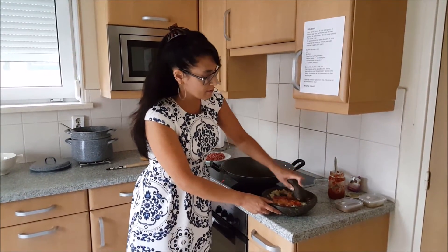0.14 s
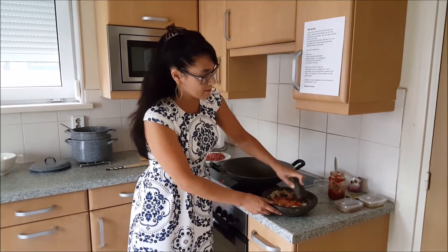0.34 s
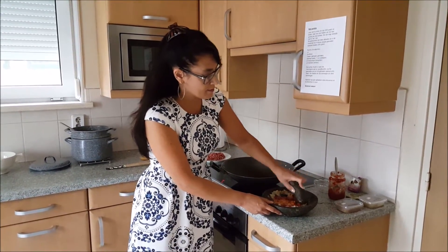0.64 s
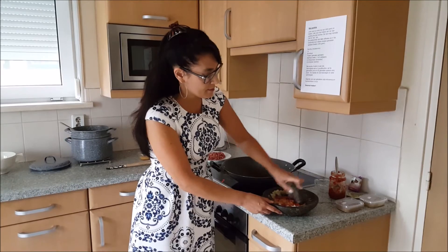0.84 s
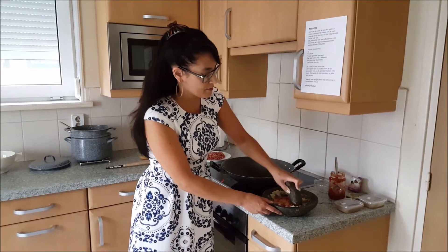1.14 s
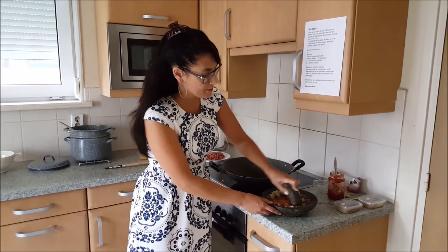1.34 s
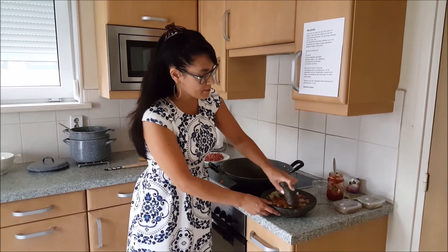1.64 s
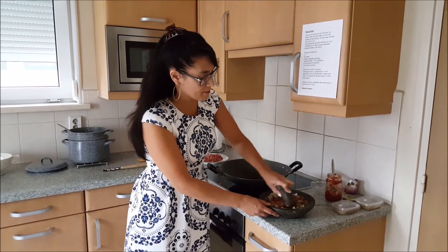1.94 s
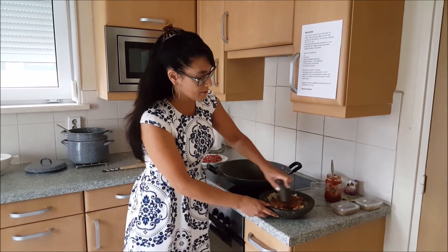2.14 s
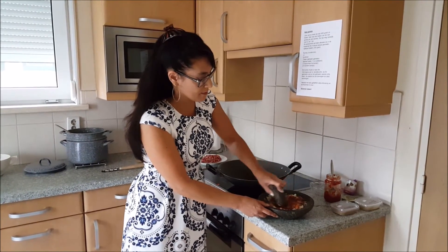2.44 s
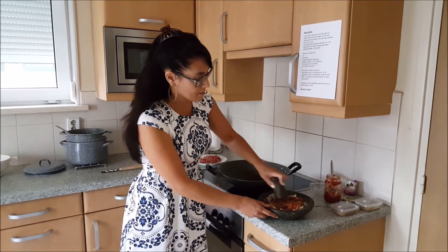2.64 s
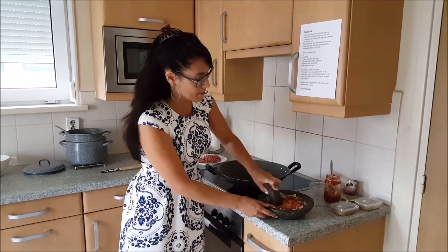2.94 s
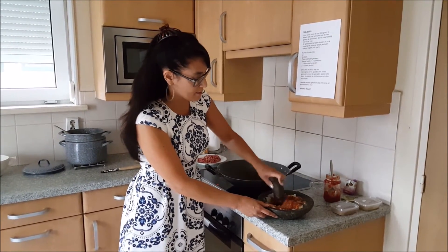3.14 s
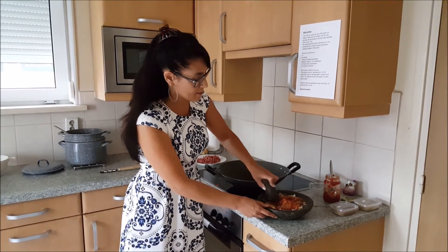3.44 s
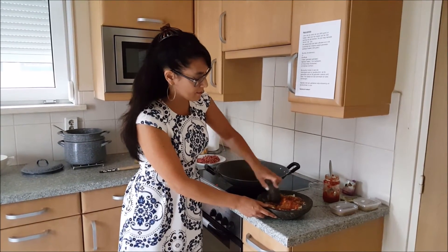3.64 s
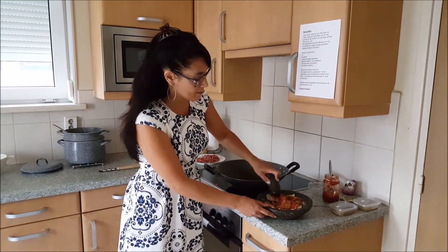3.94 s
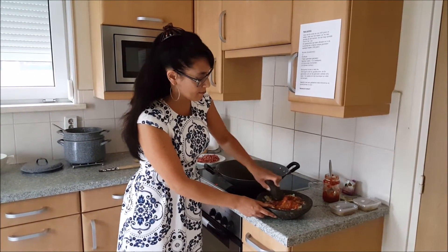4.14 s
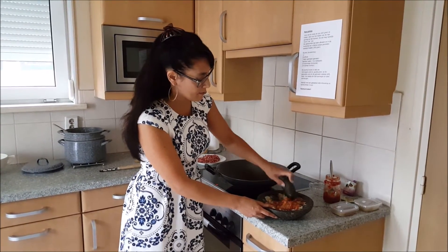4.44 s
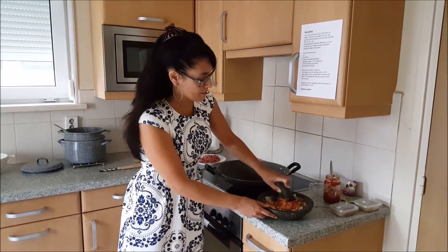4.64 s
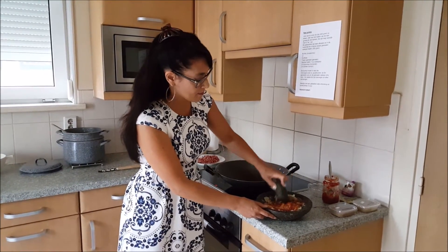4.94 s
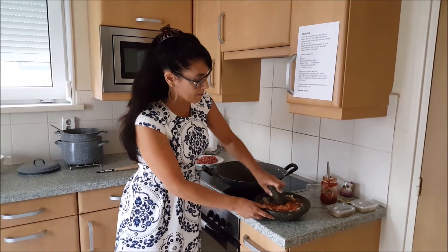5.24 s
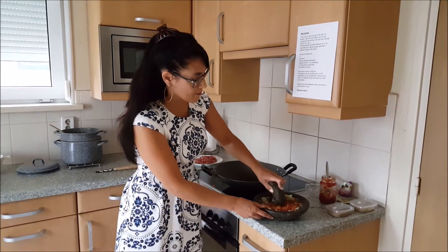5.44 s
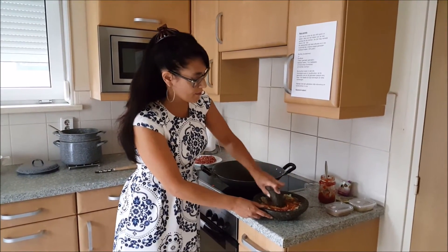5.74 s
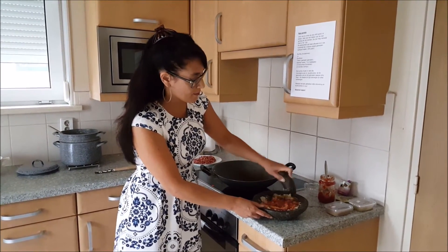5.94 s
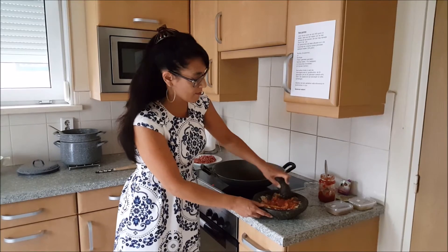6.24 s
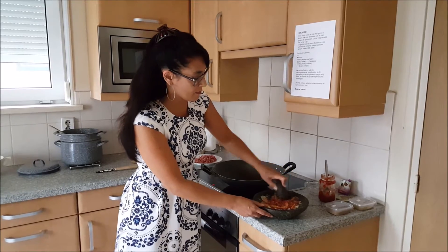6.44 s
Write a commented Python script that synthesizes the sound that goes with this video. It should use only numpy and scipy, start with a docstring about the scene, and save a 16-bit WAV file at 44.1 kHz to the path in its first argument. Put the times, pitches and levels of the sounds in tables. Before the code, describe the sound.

In a hard, tiled kitchen a stone pestle works wet paste in a stone mortar on a counter. A dull knock, a sticky smack and short gritty scrapes open; irregular knocks grow into three bright, ringing stone strikes, the last two loudest. Softer drags and wet pops follow, then light taps. A faint fridge hum and air noise run beneath. The microphone is in the room, its right side muffled.

```python
"""A stone pestle grinds and knocks spice paste in a stone mortar on a counter, over a steady fridge hum (sines) and air noise.
First come a knock, a wet smack (filtered pops) and short drags (random grit ticks driving resonances); then knocks
(damped resonances and clicks) grow, strongest at 1.7, 3.4 and 4.0 s, where stone rings brightly on stone.
Softer drags and smacks follow from 4.5 s, and lighter knocks end it. A hard tiled kitchen echoes it all (fading noise
and standing waves). The right microphone port is muffled."""
import sys
import numpy as np
from scipy import signal
from scipy.fft import rfft, irfft
from scipy.io import wavfile
from scipy.ndimage import uniform_filter1d

SR = 44100
rng = np.random.default_rng(int(sys.argv[2]) if len(sys.argv) > 2 else 0)


def generate_wav(signal):
    """Clip the signal to [-1, 1] and save it as 16-bit WAV at the path in sys.argv[1]."""
    frames = np.transpose(np.atleast_2d(signal))
    scaled = np.clip(frames, -1, 1) * 32767
    pcm = np.round(scaled).astype(np.int16)
    wavfile.write(sys.argv[1], SR, pcm)


N = 290938

# fridge hum, before it wavers: f/Hz, rms level/dB
FRIDGE_HUM = [(48.6, -62), (97.5, -73.5), (146, -86), (253, -78), (441.4, -77), (490, -77), (737.5, -82.5)]
# colour of the room air: f/Hz, relative level/dB
AIR_COLOUR = [(40, -9), (70, 2), (130, -0.5), (260, -0.5), (600, -10.5), (1500, -17.5), (4000, -24),
              (9000, -37)]
# colour of the microphone hiss: f/Hz, relative level/dB
HISS_COLOUR = [(300, 1.5), (2000, -4), (5000, -10.5), (9500, -17.5), (12500, -13.5), (15500, -10.5)]
# time the echoes take to fade by 60 dB: f/Hz, time/s
ECHO_FADE = [(50, 0.78), (130, 0.69), (350, 0.52), (920, 0.58), (2430, 0.5), (6400, 0.66), (14000, 0.47)]
# how alike the echoes are at the two ports: f/Hz, likeness (0-1)
PORT_LIKENESS = [(60, .95), (130, .96), (290, .93), (640, .75), (1410, .5), (3100, .3)]
# standing waves between the tiled walls: f/Hz, width/Hz, level/dB
STANDING_WAVES = [(70.9, 36, -1), (134.3, 7.7, -13), (207.3, 6.1, -1.5), (249.7, 18.6, -0.5),
                  (275.6, 3.48, 7), (297.7, 11, 2), (327.6, 2.5, -1.5), (399, 3.4, 0), (624.7, 12, 0)]
# wet paste letting go: t/s, level/dB, centre f/Hz, squelch length/s
PASTE_SMACKS = [(0.063, -35.5, 4950, 0.016), (.357, -41.5, 7600, 0.015), (0.606, -38.5, 6000, 0.011),
                (0.837, -43.5, 6800, 0.017), (1.391, -33, 5800, 0.015), (2.269, -43, 7000, 0.011),
                (2.685, -37, 2490, .003), (3.067, -39, 7300, 0.0046), (3.174, -39.5, 6700, .004),
                (4.533, -43, 6600, 0.011), (4.705, -35, 6500, 0.015), (5.013, -45.5, 6500, 0.0038),
                (5.369, -41, 6250, 0.0031), (5.388, -30.5, 7260, 0.0049), (6.207, -43, 5480, .003),
                (6.217, -33, 6930, 0.0059)]
# pestle dragged round the bowl: end t/s, length/s, rumble level/dB, scrape level/dB,
# fine scrape above scrape/dB, squelch level/dB
PESTLE_DRAGS = [(0.204, 0.014, -40.5, -51, -2.5, -67), (0.325, 0.3, -60, -62.5, -0.5, -66),
                (0.86, 0.067, -53, -55, .1, -69), (1.17, 0.031, -58, -57, -3.5, -62),
                (1.416, 0.16, -49, -61.5, -0.5, -62), (2.296, 0.054, -52, -59, -1.5, -62.5),
                (2.534, 0.14, -43.5, -48.5, -6.5, -63), (2.969, 0.038, -48.5, -61.5, -5, -67),
                (3.039, 0.063, -69, -58, 1.5, -73), (4.671, 0.21, -55, -68, 1, -68),
                (4.776, 0.078, -56.5, -68.5, 9, -55), (5.32, 0.059, -51, -59, -5.5, -90.5),
                (5.387, 0.011, -69, -60, 9, -80), (5.728, .04, -74, -57.5, -2, -64),
                (5.821, 0.027, -44.5, -56, -7, -60.5), (6.452, 0.087, -39.5, -52.5, 2, -55)]
# resonances under the grit, in groups (rumble, scrape, fine scrape): f/Hz, width/Hz, level/dB
GRIT_RESONANCES = [(206, 254, -1), (317.4, 310, 1)], [(710, 172, 0.5), (834, 110, 1)], [(1200, 400, -6.5),
                   (1700, 730, -9)]
# stone on stone: t/s, bowl level/dB, lean to the lower ring of the bowl's pair/dB, pestle level/dB,
# sharpness (level of the upper bowl rings)/dB
STONE_CLINKS = [(0.1977, -38, -10, -52, -57), (0.616, -34, 3, -23.5, -38.5), (0.8568, -34, -12, -43, -45),
                (1.3955, -27.5, 3, -48, -34.5), (1.7356, -7, -6, -9.5, -21.5), (2.5092, -32, -10, -60, -44),
                (3.0647, -31, -1, -32, -52), (3.409, 8.5, -3.5, -6, -15), (3.9737, 7.5, 15, -5, -15.5),
                (5.7283, -35, 12, -54, -59), (6.2238, -18, 8, -64, -40)]
# stone rings, in groups (bowl's lower, bowl's higher, pestle, upper bowl, upper pestle, highest):
# f/Hz, width/Hz, level/dB
STONE_RINGS = ([(2722, 59, 9.5)], [(2778, 63, 5)], [(3369, 130, 6), (3880, 24, -11.5)], [(4900, 110, -0.5),
               (5183, 170, 0.5), (7910, 130, -10.5)], [(6110, 70, 8.5), (7000, 130, 4.5),
               (7890, 140, -9.5)], [(10100, 70, -2), (12330, 30, 4.5)])
# blows passed into the counter: t/s, cabinet level/dB, strength/dB,
# hardness (near 0 deep in paste, near 1 on bare stone), lean to the low worktop/dB
BLOWS = [(0.074, -7, -6.5, 0.67, -3), (0.103, -30, -6.5, 0.48, -5.7), (0.195, -27, -17, 1.017, 9),
         (0.608, -8, 3.5, 0.54, -1.5), (0.659, -22, -26, .05, -3), (0.858, -39, -29, 1.09, -2),
         (1.19, -8.5, -10, 0.43, -1), (1.231, -17, -18, .05, 3.3), (1.733, -7, 8, 0.9, 1),
         (2.29, -8.5, -11, 0.31, .1), (2.369, -16, -29, .05, -1), (2.545, -21, -23.5, 1.198, 3),
         (3.409, -1, 16, 0.98, -0.7), (3.974, -28, 13, 1.028, -4), (5.106, -22.5, -29, 0.85, -1),
         (5.199, -28, -28.5, .3, 1.5), (5.622, -10, -17, 0.048, 2), (5.692, -26, -24, 0.92, -2.5),
         (5.802, -27, -22, 1.035, -1), (6.227, -36, -8, 1.139, 24.5), (6.452, -19, -20, 1.07, 3),
         (6.501, -30, -16.5, 0.46, 5.5)]
# limits between cabinet, low worktop, high worktop and mortar base: f/Hz
PART_EDGES_HZ = [40, 160, 240, 500, 1200]
# resonances of counter and mortar base: f/Hz, width/Hz, level/dB
COUNTER_RESONANCES = [(75, 19, 2), (116, 93, -6.5), (231, 81, -0.5), (240, 59, 2.5), (394, 140, -5),
                      (636, 100, -1), (768, 152, 0), (1110, 290, -7)]
# answer at hardness 0 and at hardness 1: low worktop/dB, high worktop/dB, mortar base/dB, clack/dB
SOFT_ANSWER_DB = (1.5, -16, -47, -45.5)
HARD_ANSWER_DB = (-19, -1.1, 2.33, 8.5)

AIR_DB, HISS_DB = -65.5, -70.5  # rms; air is for the part shared by both ports, hiss is before the final cuts
DIRECT_DB, STANDING_DB = -11.5, -19.5
FIRST_ECHO_S, BUILD_S = 0.00074, 0.0023  # gap before the echoes, and how quickly they build up
SMACK_ECHO_DB, FLOOR_BORNE_DB = 6, -12.5  # smacks sent into the room, thuds through the furniture
GRIT_PER_S, GRIT_SPREAD_DB = 1200, 2.5  # average tick rate, unevenness of tick size
DRAG_SWELL_DB, DRAG_RELEASE_DB_PER_S = 11.5, 300  # rise over the drag, fall after it
DRAG_RING_DB = -11.5  # stone ring under the scrape
UPPER_PESTLE_DB = -12.5  # under the pestle
HIGHEST_DB, HIGHEST_PER_LEAN = -46.5, 1  # highest ring under the bowl, and its extra dB per dB of lean
CRACK_DB, SPIT_DB = 7.5, -8  # lower and higher click, over the sharpness
CLACK_PER_STRENGTH = 0.23  # extra dB of clack per dB of strength: a stronger blow is a shorter one
LEAN_TAKES = 0.4  # share of the lean that the high worktop loses
MUFFLE_HZ, MUFFLE_DB, LEAK_DB = 237, -5.5, -28.5
BOTTOM_HZ, TOP_HZ = 48.6, 15760


def undb(db):
    """Turn dB into a plain gain."""
    return 10 ** (np.asarray(db) / 20)


def along(table, hz):
    """Read (Hz, value) points on a log-frequency axis."""
    points = np.array(table)
    return np.interp(np.log(hz), np.log(points[:, 0]), points[:, 1])


def train(s, size):
    """Place single-sample pushes at the given times in seconds."""
    x = np.zeros(N)
    places = np.clip((np.asarray(s) * SR).astype(int), 0, N - 1)
    np.add.at(x, places, size)
    return x


def band(x, lo_hz, hi_hz, order=2):
    """Keep what lies between two frequencies."""
    return signal.sosfilt(signal.butter(order, [lo_hz, hi_hz], "band", fs=SR, output="sos"), x)


def crack(s, db, lo_hz, hi_hz):
    """Make a click without pitch at each contact."""
    return band(train(s, undb(db)), lo_hz, hi_hz, order=3)


def ring(x, modes, s=None, scatter_db=2.0):
    """Damped resonances driven by signal x, or by blows of size x at times s; energy near 1 per unit push."""
    out, energy = 0, 0
    for k, (hz, width, db) in enumerate(modes):
        decay = np.exp(-np.pi * width / SR)  # a wider resonance dies sooner
        turn = 2 * np.pi * hz / SR
        force = x
        if s is not None:  # each blow wakes each resonance a little differently
            force = train(s, x * undb(scatter_db * rng.standard_normal(len(s))))
        feedback = [1, -2 * decay * np.cos(turn), decay * decay]
        tone = signal.lfilter([0, np.sin(turn)], feedback, force)
        out = out + undb(db) * width * (-1) ** k * tone
        energy += undb(2 * db) * width * SR / (4 * np.pi)
    return out / np.sqrt(energy)


def coloured(shape, db):
    """Steady noise with the given (Hz, dB) colour and rms level."""
    hz = np.maximum(np.fft.rfftfreq(N, 1 / SR), 1)
    x = irfft(rfft(rng.standard_normal(N)) * undb(along(shape, hz)), N)
    return x * undb(db) / x.std()


def walk(rate):
    """Random wandering: new values at the given rate per second, smoothed twice; spread near 1."""
    hold = int(SR / rate)
    steps = np.repeat(rng.standard_normal(N // hold + 1), hold)
    return 1.3 * uniform_filter1d(uniform_filter1d(steps, hold), hold)[:N]


def fridge():
    """Compressor harmonics waver in level, over the slowly swelling air noise of the room."""
    t = np.arange(N) / SR
    hum = 0
    for hz, db in FRIDGE_HUM:
        level = undb(db + 1.5 * walk(4.8)) * np.sqrt(2)
        hum = hum + level * np.sin(2 * np.pi * (hz * t + rng.random()))
    mid, side = coloured(AIR_COLOUR, AIR_DB), coloured(AIR_COLOUR, AIR_DB - 4.5)
    swell = undb(0.8 * walk(2))
    return hum + swell * np.array([mid + side, mid - side])


def kitchen():
    """Answer of the room at both ports: direct sound, short gap, echoes fading band by band, standing waves."""
    t = np.arange(SR) / SR
    hz = np.fft.rfftfreq(SR, 1 / SR)
    late = np.maximum(t - FIRST_ECHO_S, 0)
    build = 1 - np.exp(-late / BUILD_S)
    noise, out = rfft(rng.standard_normal((2, SR))), np.zeros((2, SR))
    for centre in 30 * 2 ** (np.arange(28) / 3):  # third-octave steps
        window = np.cos(np.pi / 2 * np.clip(3 * np.log2(hz / centre + 1e-9), -1, 1)) ** 2
        fade = 1000.0 ** (-late / along(ECHO_FADE, centre))
        tail = irfft(noise * window, SR) * build * fade
        tail *= np.sqrt(np.mean(window ** 2) / np.sum(tail ** 2, axis=1, keepdims=True))
        alike = np.clip(along(PORT_LIKENESS, centre), 0, 1)
        out += [tail[0], alike * tail[0] + np.sqrt(1 - alike ** 2) * tail[1]]
    out += undb(STANDING_DB) * ring(1.0 * (t == 0), STANDING_WAVES)
    out[:, 0] += undb(DIRECT_DB)
    return out


def smacks():
    """Wet paste lets go with a sharp pop, then a burst of tiny bubbles that dies away."""
    out = np.zeros(N)
    t = np.arange(4000) / SR
    for s, db, hz, length in PASTE_SMACKS:
        bubbles = rng.standard_normal(len(t)) * (rng.random(len(t)) < 0.15)
        pops = 0.13 * bubbles * np.exp(-t / max(length, 1e-3))
        pops[0] = 1  # the first sharp pop
        i = int(s * SR)
        out[i:i + len(t)] += undb(db) * band(pops, 0.49 * hz, 1.18 * hz)
    return out


def grinding():
    """Grit slips in dense uneven ticks that drive the counter, the bowl and its ring; paste squelches on top."""
    t, gains = np.arange(N) / SR, np.zeros((4, N))
    for end, length, rumble_db, scrape_db, bright_db, wet_db in PESTLE_DRAGS:
        levels = [rumble_db, scrape_db, scrape_db + bright_db, wet_db]
        rise_db = DRAG_SWELL_DB * (t - end) / length
        fall_db = DRAG_RELEASE_DB_PER_S * (end - t)
        press_db = np.where(t < end, rise_db, fall_db)
        gains += undb(levels)[:, None] * undb(press_db) * (t > end - length)
    rumble, scrape, fine, wet = uniform_filter1d(gains, size=200)

    slips = rng.random(N) < GRIT_PER_S / SR
    ticks = slips * undb(GRIT_SPREAD_DB * rng.exponential(size=N)) * rng.choice([-1, 1], N)
    ticks = ticks / ticks.std() * undb(0.44 * walk(15))

    bowl = ring(ticks * scrape, STONE_RINGS[0] + STONE_RINGS[1])
    upper_bowl = undb(-14.5) * ring(ticks * scrape, STONE_RINGS[3])
    stone = undb(DRAG_RING_DB) * band(bowl + upper_bowl, 1900, 9000)
    squelch = band(ticks[::-1] * wet, 2300, 6500, order=3)  # reversed, so it does not copy the grit
    grit = sum(ring(ticks * gain, modes) for gain, modes in zip([rumble, scrape, fine], GRIT_RESONANCES))
    return grit + stone + squelch


def clinks():
    """Bare stone contact rings the bowl and the pestle over a dry crack; small stones radiate no bass."""
    s, bowl_db, lean_db, pestle_db, sharp_db = np.transpose(STONE_CLINKS)
    highest_db = bowl_db + HIGHEST_DB + HIGHEST_PER_LEAN * lean_db
    levels = [bowl_db + lean_db / 2, bowl_db - lean_db / 2, pestle_db,
              sharp_db, pestle_db + UPPER_PESTLE_DB, highest_db]
    rings = 0
    for db, modes in zip(levels, STONE_RINGS):
        tone = ring(undb(db), modes, s, scatter_db=0.0)
        rings = rings + band(tone, 0.916 * modes[0][0], 0.985 * modes[-1][0])
    dry_crack = crack(s, sharp_db + CRACK_DB, 3800, 7500)
    spit = crack(s, sharp_db + SPIT_DB, 8000, 15000)
    return rings + dry_crack + spit


def knocks():
    """Each blow shakes cabinet, worktop and mortar base, favouring higher parts when hard, and clacks unpitched."""
    s, cabinet_db, strength_db, hardness, lean_db = np.transpose(BLOWS)
    low_db, high_db, base_db, clack_db = [strength_db + soft + hardness * (hard - soft)
                                          for soft, hard in zip(SOFT_ANSWER_DB, HARD_ANSWER_DB)]
    clack_db = clack_db + CLACK_PER_STRENGTH * strength_db
    levels = [cabinet_db, low_db + lean_db, high_db - LEAN_TAKES * lean_db, base_db]
    body = 0
    for db, lo, hi in zip(levels, PART_EDGES_HZ, PART_EDGES_HZ[1:]):
        modes = [m for m in COUNTER_RESONANCES if lo <= m[0] < hi]
        # the parts answer a fraction of a cycle apart, and mostly near their own pitch: the paste cushions the push
        lag = rng.random(len(s)) / (2 * hi)
        body = body + band(ring(undb(db), modes, s + lag), 0.62 * lo, 2.6 * hi, order=1)
    body = signal.sosfilt(signal.butter(2, 1500, fs=SR, output="sos"), body)
    clack = crack(s, clack_db, 1230, 3200)
    clack = signal.lfilter(*signal.butter(1, 1300, fs=SR), clack)
    clack = signal.sosfilt(signal.cheby1(8, 1, 3000, fs=SR, output="sos"), clack)
    return body, clack


def scene():
    """Send the mortar sounds through the kitchen, then add the near sounds and the fridge."""
    pops = smacks()
    body, clack = knocks()
    dry = body + clack + clinks() + undb(SMACK_ECHO_DB) * pops + grinding()
    # the smacks face the microphone and the thuds also come through the furniture: both stand out of the echoes
    near = pops + undb(FLOOR_BORNE_DB) * band(body, 45, 320, order=1)
    echoed = signal.fftconvolve(dry[None], kitchen(), axes=1)[:, :N]
    return echoed + near + fridge()


def record(dry):
    """The covered right port passes bass and leaks a little treble; each side hisses alone; both ends are cut."""
    bass = signal.lfilter(*signal.butter(1, MUFFLE_HZ, fs=SR), dry[1])
    right = undb(MUFFLE_DB) * bass + undb(LEAK_DB) * dry[1]
    ports = np.array([dry[0], right])
    ports += [coloured(HISS_COLOUR, HISS_DB), coloured(HISS_COLOUR, HISS_DB)]
    ports = signal.sosfilt(signal.butter(4, BOTTOM_HZ, "high", fs=SR, output="sos"), ports)
    return signal.sosfilt(signal.ellip(12, 0.2, 80, TOP_HZ, fs=SR, output="sos"), ports)


dry = scene()
out = record(dry)
generate_wav(out)
```